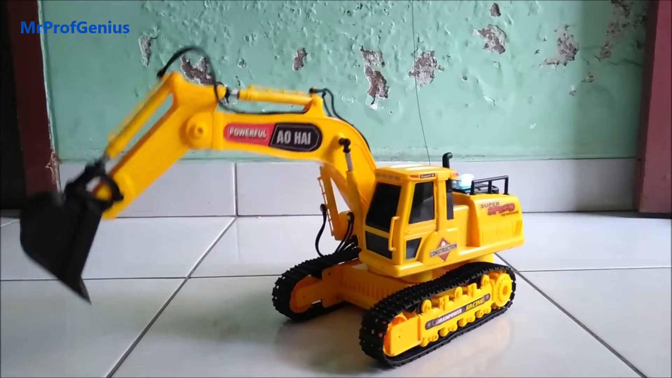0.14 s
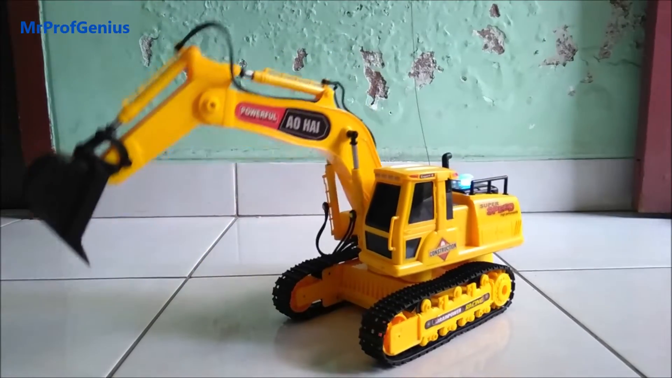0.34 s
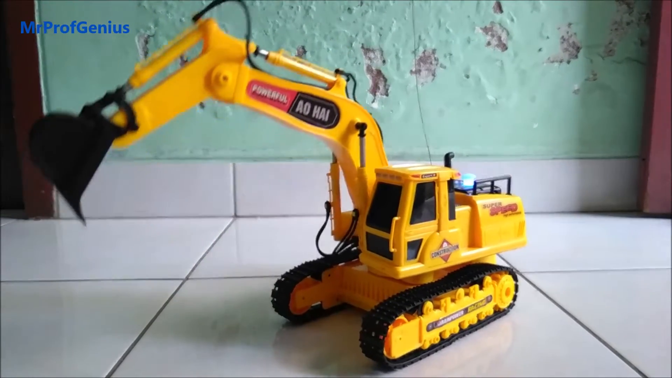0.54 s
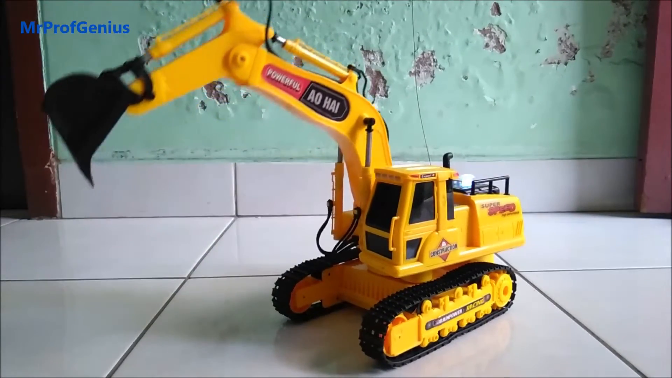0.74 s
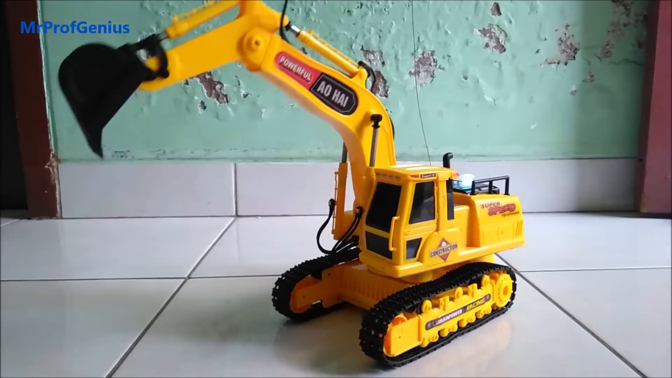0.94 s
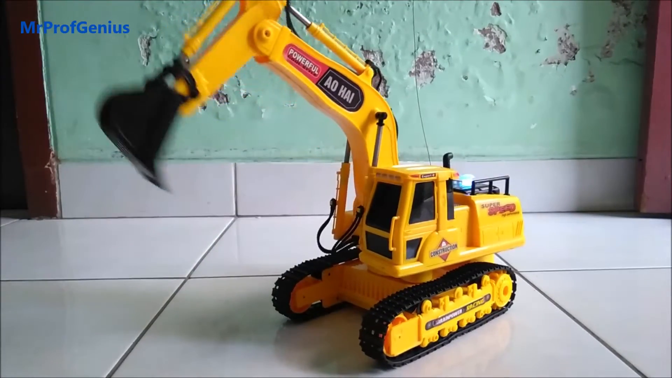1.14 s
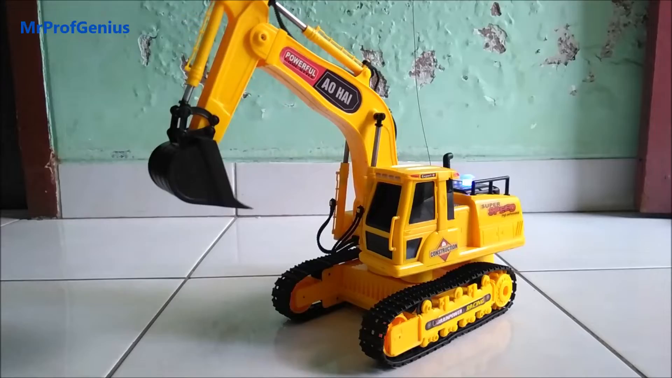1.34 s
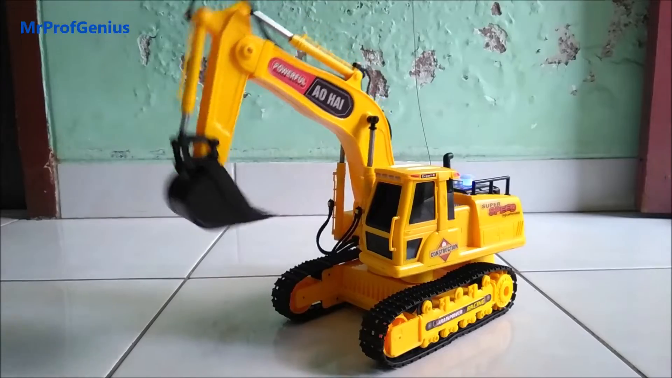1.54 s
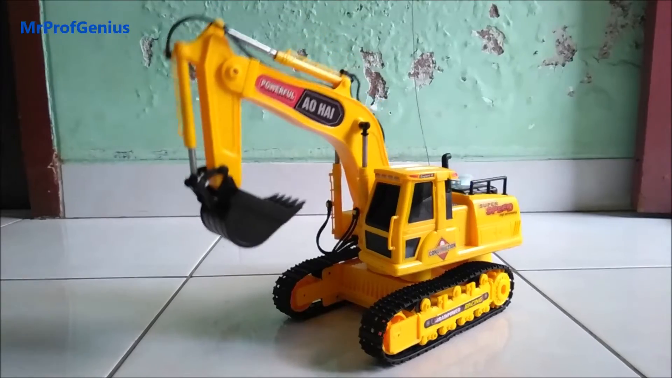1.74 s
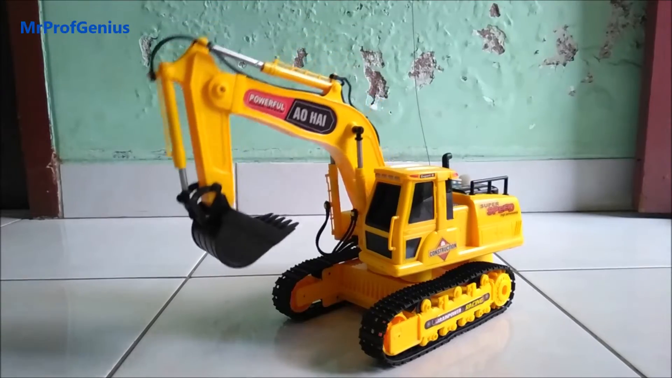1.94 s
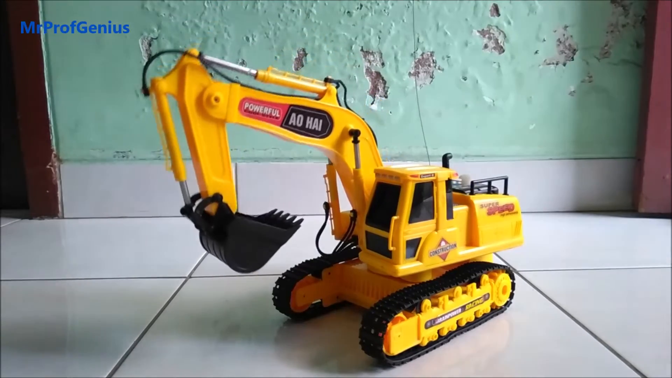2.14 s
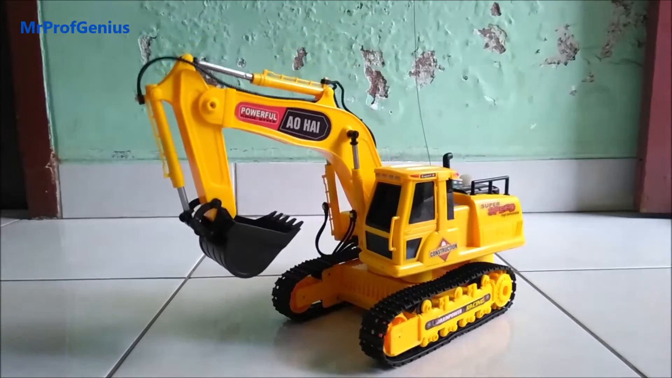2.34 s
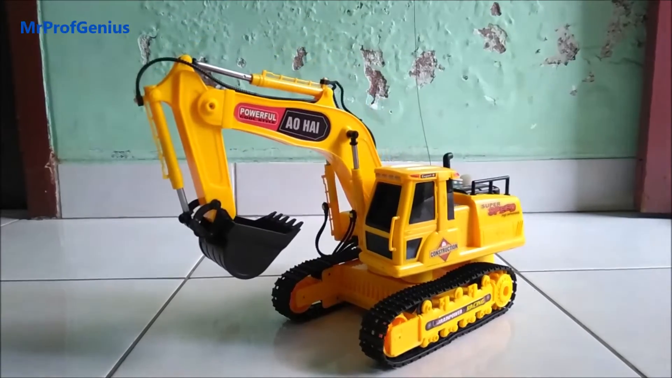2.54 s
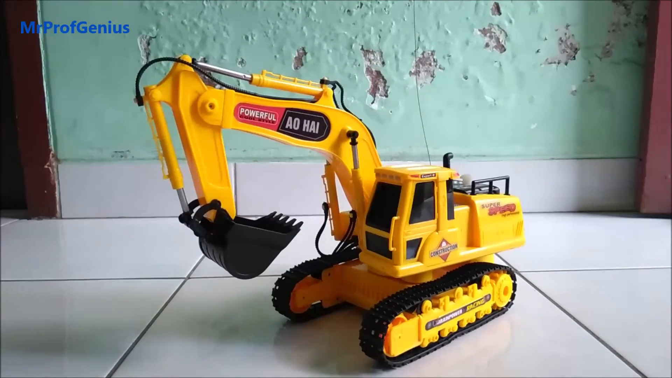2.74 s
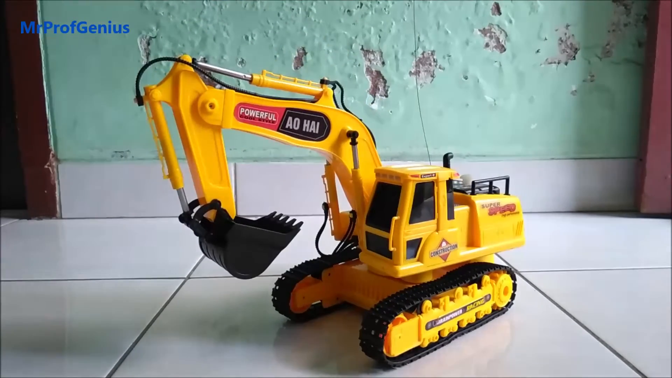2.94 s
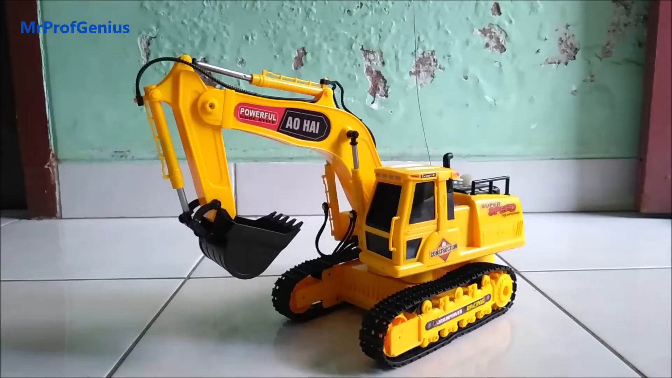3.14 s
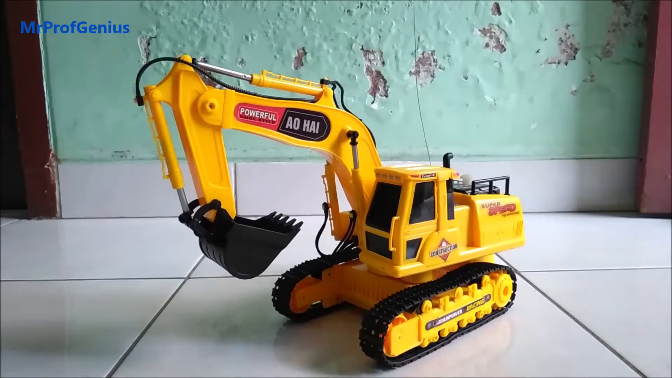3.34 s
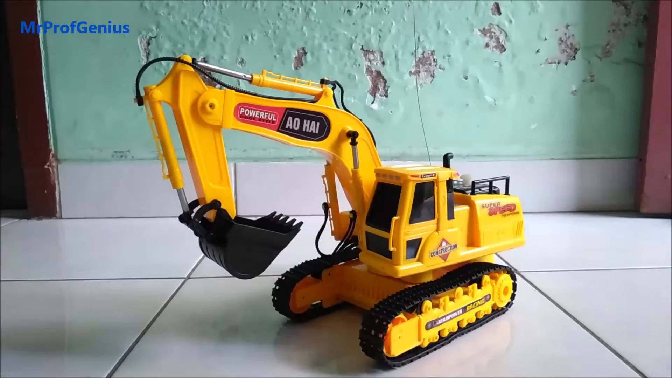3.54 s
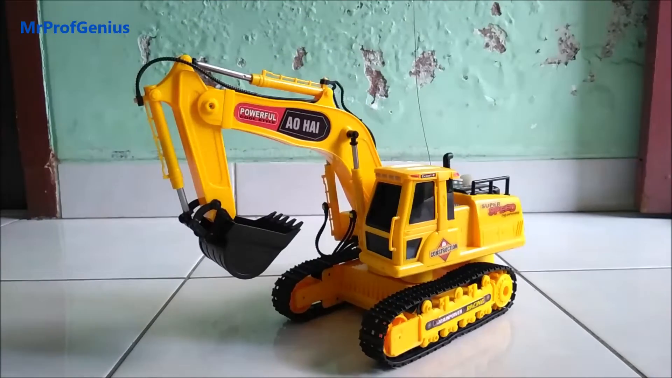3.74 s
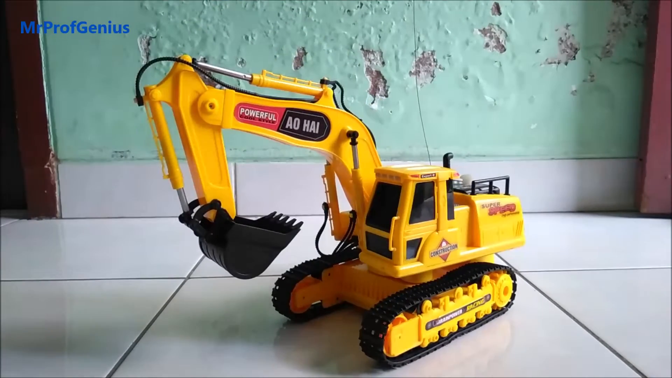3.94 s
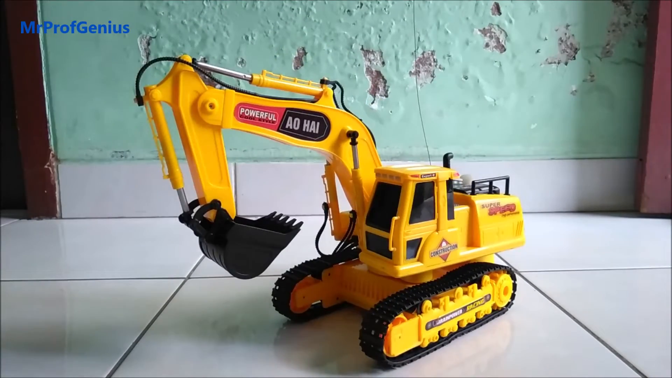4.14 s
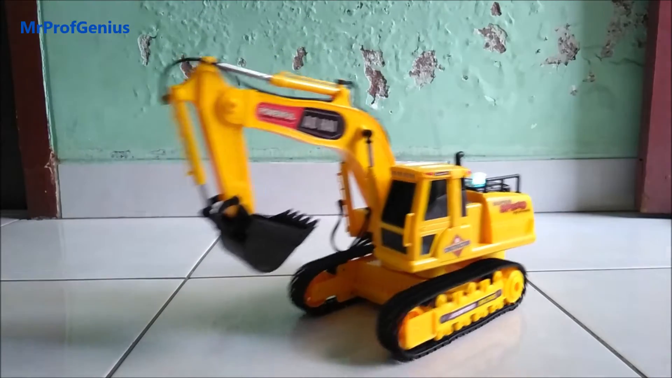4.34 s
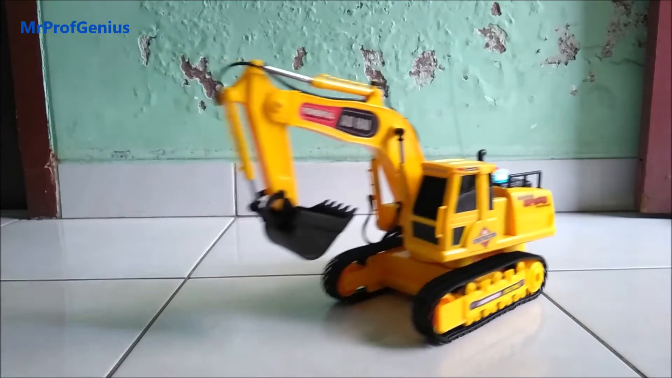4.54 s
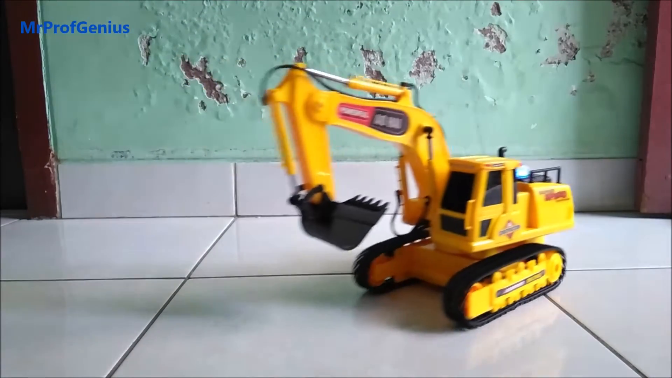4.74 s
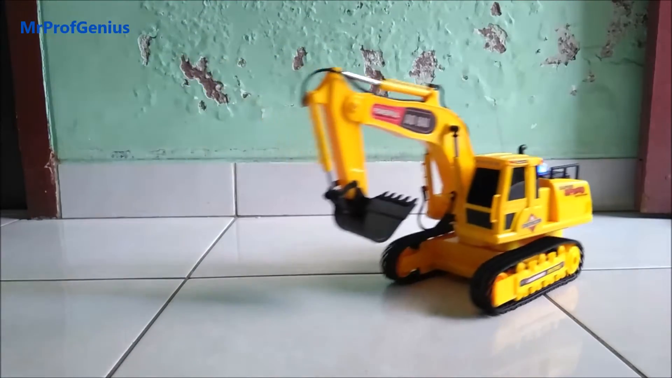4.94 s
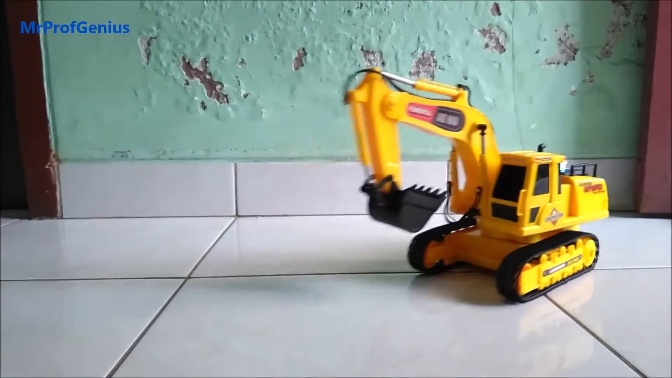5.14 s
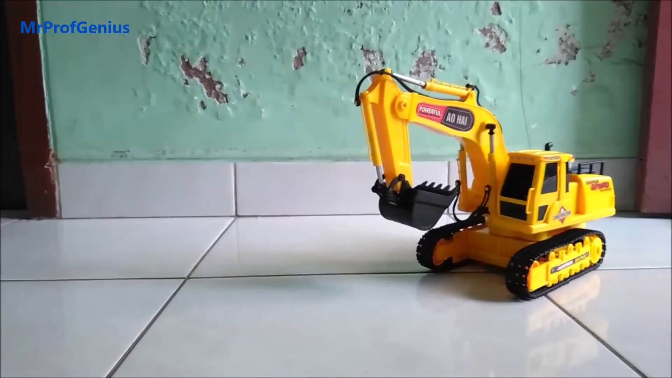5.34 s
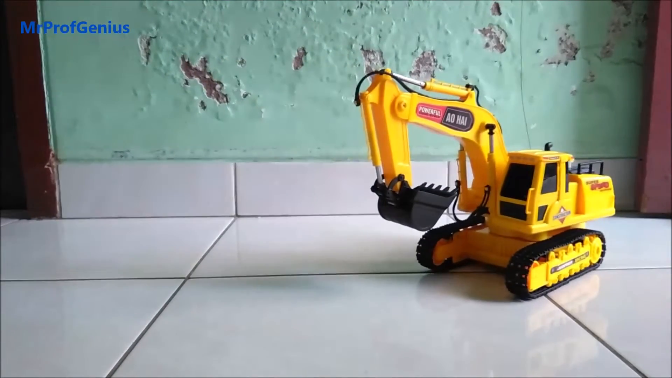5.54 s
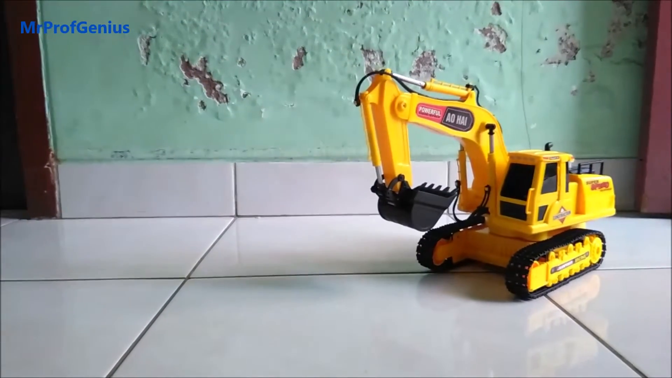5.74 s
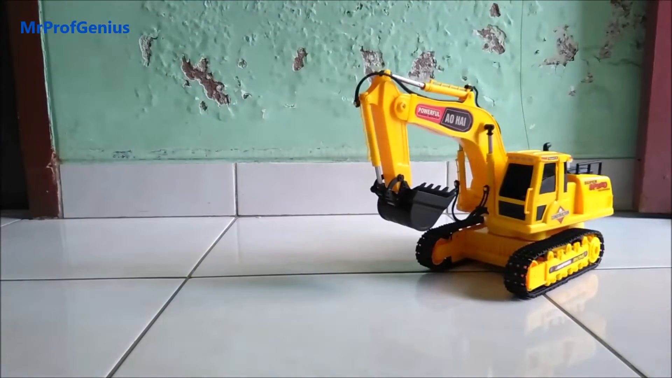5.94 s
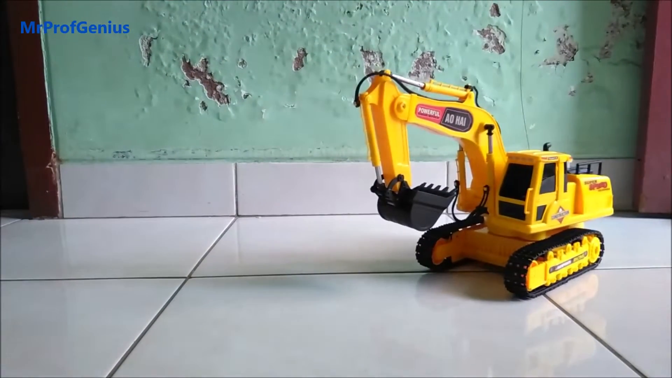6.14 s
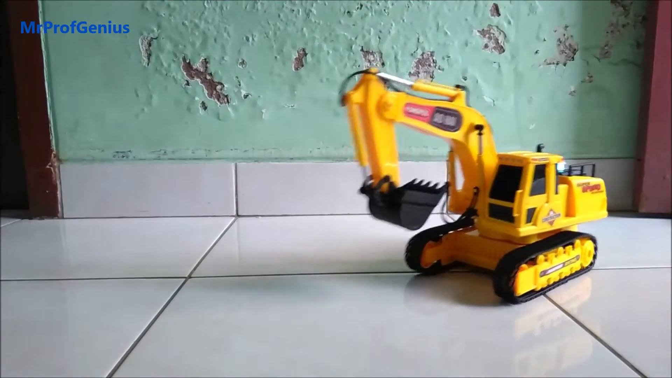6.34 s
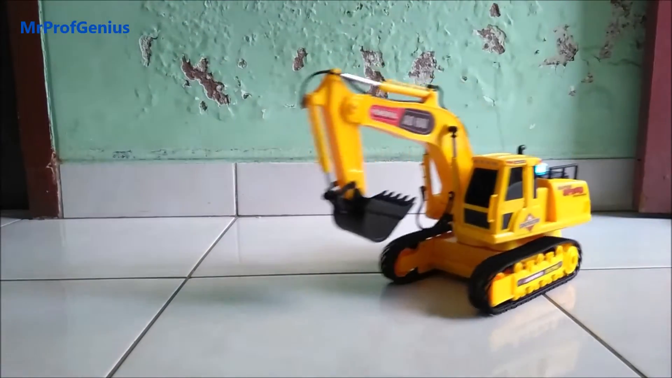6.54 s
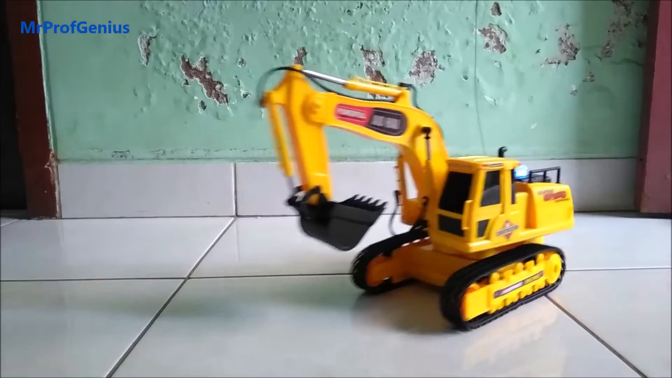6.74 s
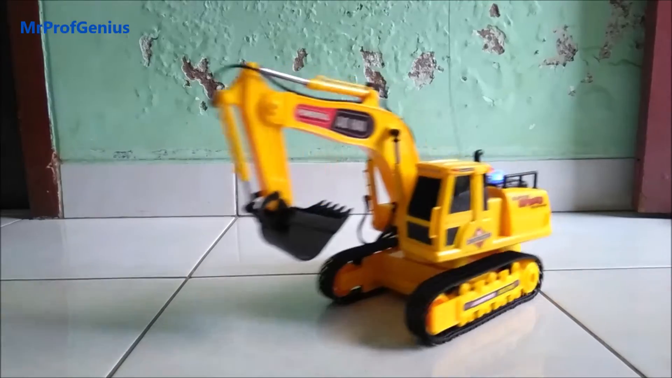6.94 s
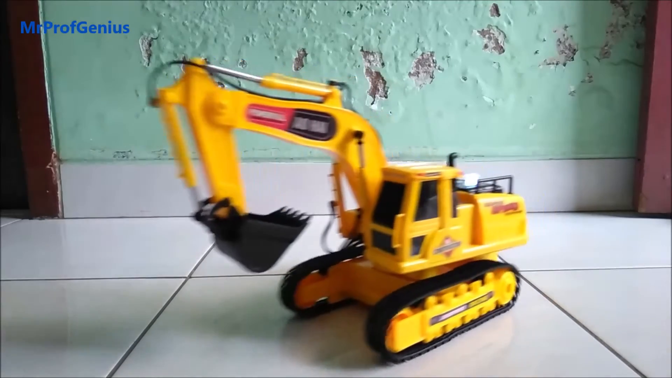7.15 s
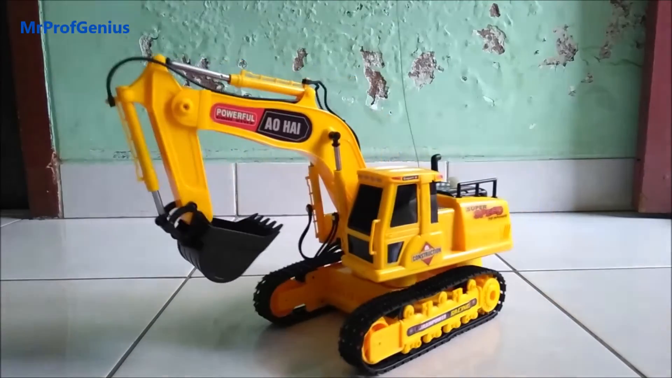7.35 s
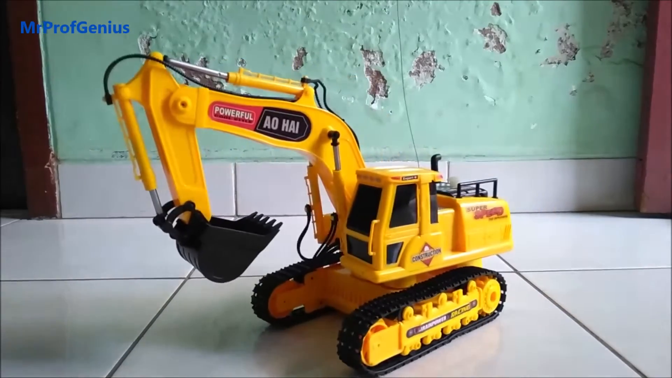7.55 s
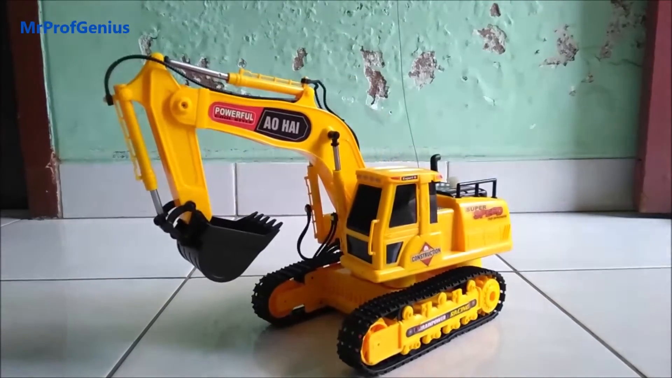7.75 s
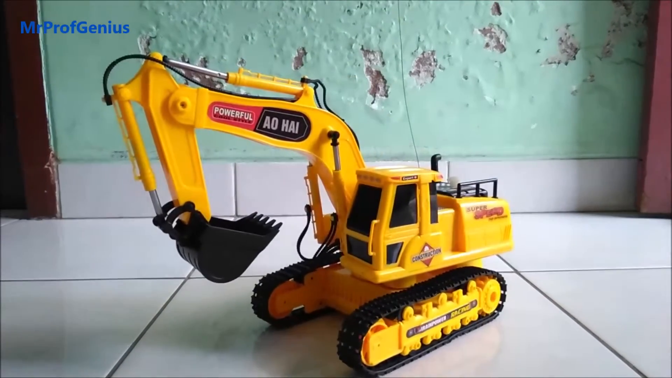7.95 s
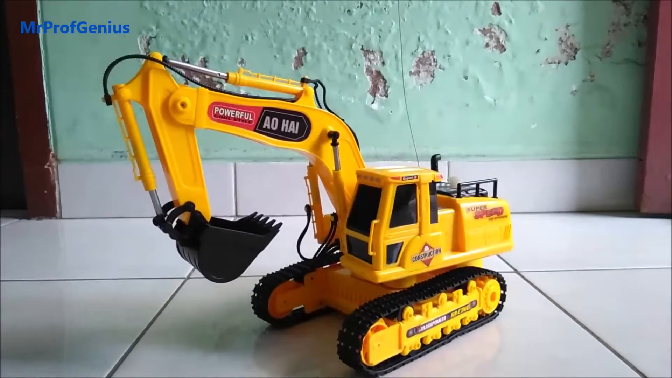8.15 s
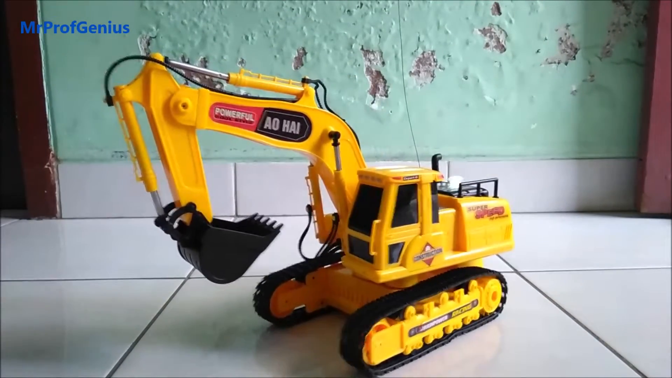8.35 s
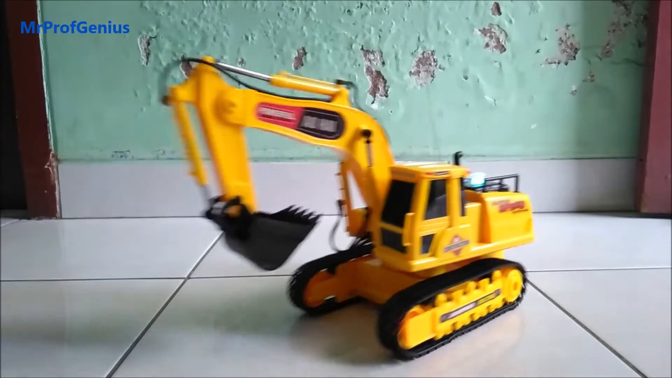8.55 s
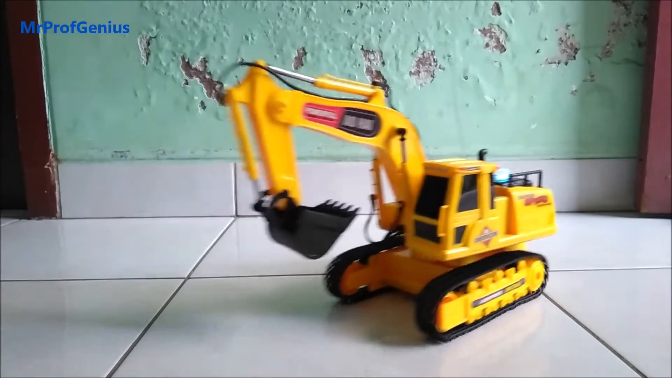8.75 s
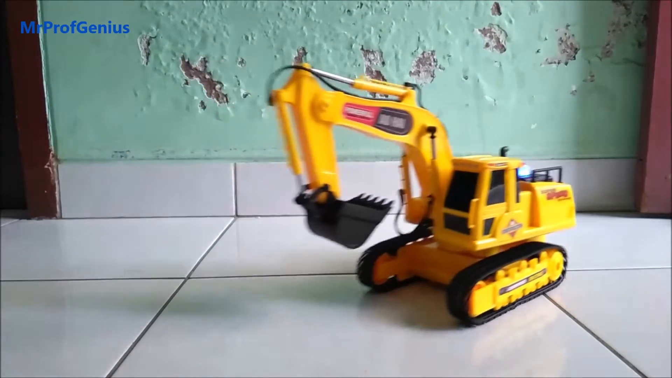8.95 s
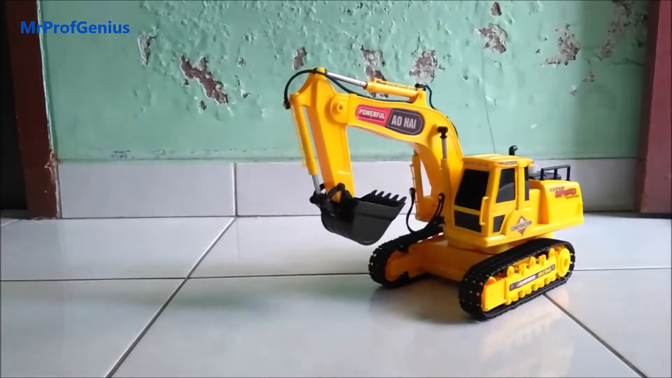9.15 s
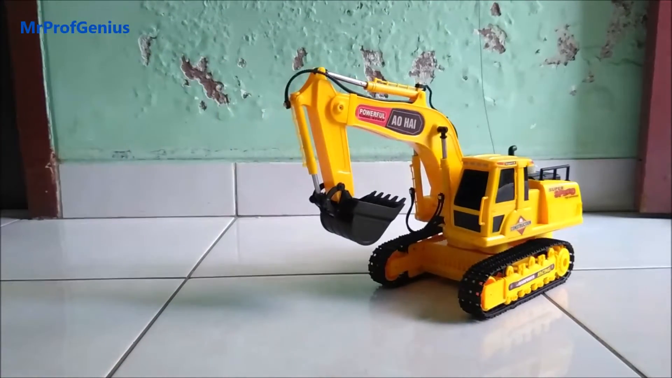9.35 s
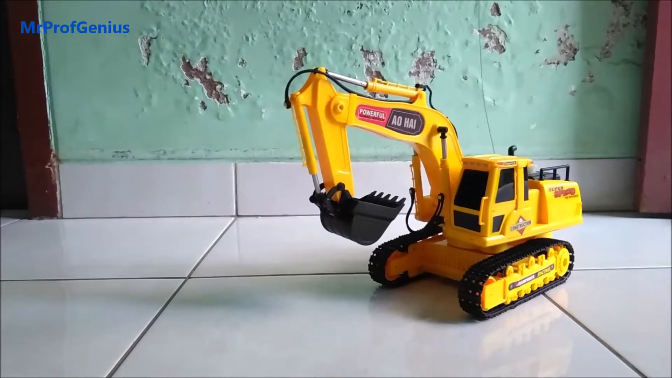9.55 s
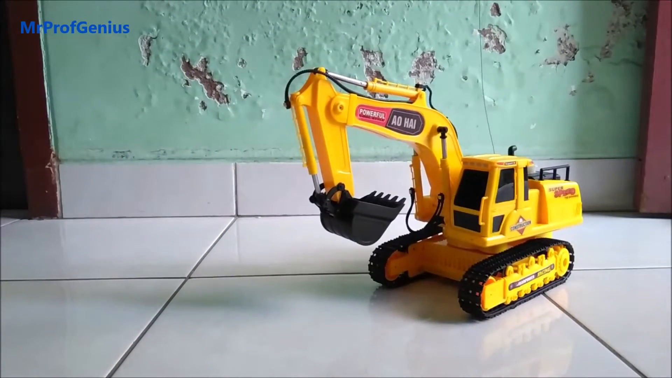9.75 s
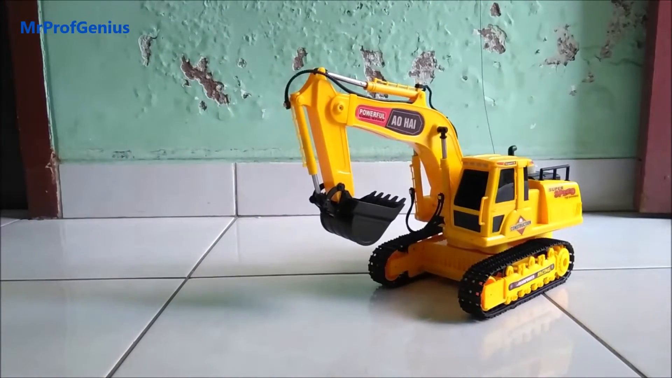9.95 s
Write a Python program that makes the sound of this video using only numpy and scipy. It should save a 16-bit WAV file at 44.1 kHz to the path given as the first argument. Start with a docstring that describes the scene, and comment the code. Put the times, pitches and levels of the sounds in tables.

```python
"""Toy digger on tiles.

A plastic digger's three-pole arm motor whines, speeds up and coasts to a stop; then the track gears
rattle through three short drives, each after a click of the remote's lever. The room hums low and rings
a little. A one-microphone camera stands near; its noise suppressor shuts the toy's treble when quiet."""
import sys
import numpy as np
from scipy import signal
from scipy.fft import rfft, irfft, next_fast_len
from scipy.io import wavfile
from scipy.ndimage import uniform_filter1d, map_coordinates

SR = 44100
rng = np.random.default_rng(int(sys.argv[2]) if len(sys.argv) > 2 else 0)


def dump(signal):
    """Clip the signal to [-1, 1] and save it as 16-bit WAV at the path in sys.argv[1]."""
    limited = np.clip(np.atleast_2d(signal).T, -1, 1)
    pcm = np.round(limited * 32767).astype(np.int16)
    wavfile.write(sys.argv[1], SR, pcm)


N = 440559

# Room rumble spectrum. Each row: frequency in Hz, relative density in dB.
RUMBLE_SPECTRUM = [(22, -41.5), (38, -9), (103, 3.5), (134, 0), (152, 3), (167, -7.5), (199, -2),
                   (212, -5.5), (228, -11.5), (330, -29), (430, -49), (730, -120)]
# Blotchy low-mid murk spectrum. Each row: frequency in Hz, relative density in dB.
MURK_SPECTRUM = [(150, -33.5), (250, -8.5), (366, -7.5), (437, 2), (564, -17.5), (673, -6), (735, -17.5),
                 (1470, -5), (1760, -25), (1880, -24), (2600, -51.5), (3380, -73.5), (5720, -120)]
# Mains hum. Each row: frequency in Hz, level in dB.
MAINS_PARTIALS = [(50, -69), (100, -68.5), (200, -65)]
# Amplifier hiss spectrum. Each row: frequency in Hz, relative density in dB.
AMPLIFIER_SPECTRUM = [(1200, -19.5), (2000, -1), (5000, -8), (10000, -7), (12600, -5.5), (13200, -30),
                      (15700, -29)]
# Faint far peeps. Each row: start in seconds, length in seconds, pitch in Hz, level in dB.
FAR_PEEPS = [(2.82, 0.055, 7550, -80), (5.956, .14, 7650, -71.5)]
# Soft far thumps. Each row: start in seconds, length in seconds, pitch in Hz, level in dB.
FAR_THUMPS = [(2.48, 0.29, 89.3, -49), (8.13, 0.34, 88.5, -50)]
# Room decay. Each row: frequency in Hz, T60 in seconds.
ROOM_DECAY = [(300, 0.27), (2000, 0.7), (8000, 0.64), (15000, 0.38)]
# Noise suppressor. Each row: frequency in Hz, threshold in dB per bin.
GATE_THRESHOLDS = [(500, -105), (2000, -96.5), (5000, -89.5), (10000, -95), (15000, -98)]

# Jolts from the swinging arm. Each row: start in seconds, level in dB.
ARM_JOLTS = [(0.0, -41.5), (0.37, -48), (0.6, -41), (1.02, -49), (1.15, -56), (1.45, -48), (1.63, -45),
             (1.95, -65)]
# Chassis shudder spectrum. Each row: frequency in Hz, relative density in dB.
ROCKING_SPECTRUM = [(30, -46), (48, -10), (65, 2.5), (90, -0.5), (150, -8.5), (220, -36.5)]
# Lever clicks, plastic ticks, gears taking up slack. Each row: start in seconds, relative level in dB,
# snap centre in Hz, relative case ring in dB, snap fall-off one octave away in dB (sign ignored).
CLICK_EVENTS = [(3.144, -41, 4230, -3, 5), (3.1939, -44, 3900, 1, 25), (3.269, -49, 8540, -2, 40),
                (3.9785, -29, 7400, -10.5, 17.5), (4.2607, -39, 2570, -32, 14), (5.8925, -67, 3480, 20, 15),
                (6.2617, -24.5, 4300, -32.5, 20), (8.136, -27, 6860, -7, -5),
                (8.2054, -39.5, 2750, -14.5, 8.5), (8.2362, -55.5, 2950, 17, 8.5),
                (8.2706, -46.5, 3990, -20.5, 13.5), (8.3757, -33, 2680, -42.5, 10),
                (9.8185, -47, 2900, -21, 7.5), (9.9183, -44, 3220, 7, 5)]
# Hollow case modes. Each row: frequency in Hz, relative level in dB, T60 in seconds.
CASE_MODES = [(560, 0, 0.025), (717, 3, 0.024), (975, 0, 0.018), (1200, 0, 0.014), (1753, 1, 0.012),
              (2860, -5, 0.02), (3530, -6, .018), (4100, -4, .02)]
# Track links hitting tile. Each row: start in seconds, level in dB, thud gain in dB, edge gain in dB.
LINK_KNOCKS = [(4.3565, -37, -4.5, -22), (5.0607, -30.5, -6, -19), (6.3962, -40.5, -17, -23),
               (6.4474, -33, -20, -19), (6.4875, -26.5, -26, -22), (6.642, -24.5, -21, -22.5),
               (6.8542, -25, -17.5, -21.5), (7.089, -25.5, -17.5, -5), (7.097, -27, -5, -9.5),
               (7.1362, -24.5, -10.5, -6), (7.141, -29.5, 5, 3.5)]
# Track link modes. Each row: frequency in Hz, relative level in dB, T60 in seconds.
LINK_MODES = [(562, 1, 0.022), (730, 3, 0.02), (1073, 2, 0.016), (1513, 7, 0.013), (1753, -8, 0.02)]

# Arm gear noise. Each row: time in seconds, hiss level in dB, linkage scrape level in dB.
ARM_LEVELS = [(0.0, -48, -60), (0.4, -48.5, -67), (0.86, -46, -83), (1.06, -40.5, -45), (1.14, -43, -65),
              (1.62, -42.5, -68), (1.8, -42.5, -57), (1.95, -48.5, -64), (2.29, -56, -81),
              (2.39, -62.5, -70), (2.55, -95, -83)]
# Arm motor speed until power off. Each row: time in seconds, shaft rate in Hz.
SHAFT_SPEED = [(0, 331), (.06, 324), (.11, 323.9), (.15, 321), (.2, 322.2), (.31, 321.3), (.36, 316.4),
               (.5, 322.4), (.56, 322.7), (.62, 325.9), (.75, 330.3), (.8, 335.2), (.89, 339.2),
               (.93, 339.7), (1.08, 350.5), (1.16, 366.9), (1.22, 373.7), (1.29, 377.6), (1.4, 378),
               (1.61, 377.7)]
# Low shaft harmonics. Each row: multiple of the shaft rate, level before resonances in dB.
SHAFT_HARMONICS = [(1, -55), (2, -52), (3, -59), (4, -61), (5, -52), (6, -62), (7, -63), (8, -67), (9, -65),
                   (10, -66), (11, -66), (12, -65), (13, -71), (14, -75), (15, -66), (16, -70), (17, -74)]
# Motor housing resonances. Each row: centre in Hz, width in Hz, gain in dB.
HOUSING_RESONANCES = [(374, 25, 18), (659, 54, 8), (1025, 63, 14), (1372, 34, 17), (1936, 58, 17),
                      (2414, 60, 7), (3115, 450, 5), (3572, 121, 6), (4525, 114, 9), (5417, 275, 8),
                      (6726, 168, 4), (7725, 235, 6), (8729, 942, 8), (10521, 500, 9), (11305, 283, 11),
                      (12277, 313, 4), (13737, 344, 14), (14601, 511, 18), (15532, 388, 15)]
# Hollow arm resonances. Each row: centre in Hz, width in Hz, gain in dB.
ARM_RESONANCES = [(507, 110, 11), (846, 130, 0)]
# Arm gearbox resonances. Each row: centre in Hz, width in Hz, gain in dB.
GEARBOX_RESONANCES = [(1140, 150, -2.5), (1885, 87, 8), (6870, 240, 11.5), (8960, 250, 8.5),
                      (11300, 270, 3), (14370, 740, 6.5)]
# Arm gear hiss spectrum. Each row: frequency in Hz, relative density in dB.
GEAR_SPECTRUM = [(150, -8), (330, -10.5), (600, -4.5), (760, -2.5), (880, -12), (1100, -7), (1350, -6.5),
                 (1700, -7), (2200, -12), (4800, -16.5), (7600, -22), (10800, -9.5), (12500, -18.5),
                 (15700, -16)]
# Linkage scrape spectrum. Each row: frequency in Hz, relative density in dB.
SCRAPE_SPECTRUM = [(3000, -50.5), (6500, -2), (8000, -8), (9500, -4.5), (14000, -32)]

# Track drives. Each row: power on in seconds, power off in seconds, rattle level in dB,
# relative brightness in dB, brightening in dB per second, relative grind in dB.
TRACK_DRIVES = [(4.211, 5.142, -35, -15, 8.5, -15), (6.213, 7.224, -35, -15, 5.2, -16),
                (8.327, 8.977, -35.5, -13, 7, -13.5)]
# Track gear rattle spectrum. Each row: frequency in Hz, relative density in dB.
RATTLE_SPECTRUM = [(250, -41.5), (400, -17), (800, -16.5), (1100, -9), (2000, -8.5), (3000, -2.5),
                   (5500, -8.5), (7500, -5), (10000, -13), (12500, -17.5), (15700, -21.5)]
# Chassis shell resonances. Each row: centre in Hz, width in Hz, gain in dB.
SHELL_RESONANCES = [(565, 70, 8), (1530, 120, 7), (1800, 120, 3), (2640, 300, 8), (3150, 150, 4),
                    (3720, 130, 6), (4290, 140, 10), (5120, 200, 6), (5800, 130, 4), (6200, 200, 6),
                    (7490, 180, 3), (8900, 300, 2), (10920, 150, 5)]


def amp(db):
    return 10 ** (np.asarray(db) / 20)


def unit_rms(x):
    return x / np.sqrt(np.mean(x ** 2) + 1e-20)


def along(points, hz):
    """Interpolate (Hz, value) points on a log frequency axis."""
    points_hz, values = np.transpose(points)
    return np.interp(np.log(hz + 1), np.log(points_hz + 1), values)


def curves(rows, count):
    """One value per sample for each column after the time."""
    times_s, *columns = np.transpose(rows)
    return [np.interp(np.arange(count) / SR, times_s, column) for column in columns]


def wobble(rate_hz):
    """Smooth random curve through unit-variance knots."""
    knots = rng.standard_normal(int(N * rate_hz / SR) + 4)
    return map_coordinates(knots, [np.arange(N) * rate_hz / SR])


def filtered(x, response):
    """Apply a zero-phase gain, given as a function of Hz."""
    size = next_fast_len(N + SR // 2)
    return irfft(rfft(x, size) * response(np.fft.rfftfreq(size, 1 / SR)), size)[..., :N]


def coloured(x, spectrum):
    """Shape x by a spectrum; RMS 1."""
    return unit_rms(filtered(x, lambda hz: amp(along(spectrum, hz))))


def boost(resonances, hz):
    """Gain of a flat path plus resonant peaks."""
    peaks = sum(amp(2 * db) / (1 + (2 * (hz - centre_hz) / width_hz) ** 2)
                for centre_hz, width_hz, db in resonances)
    return np.sqrt(1 + peaks)


def patchy(x, depth_db):
    """Random gain in patches of frequency and time."""
    bins = signal.stft(x, nperseg=1024)[2]
    field = uniform_filter1d(rng.standard_normal(bins.shape), 4, axis=0)
    field = uniform_filter1d(field, 7, axis=1)
    return signal.istft(bins * amp(depth_db * unit_rms(field)), nperseg=1024)[1][:N]


def ring(modes, t, thud_db=0):
    """Damped modes, varied per hit by grip and load; thud_db acts below 1200 Hz."""
    return sum(amp(db + thud_db * (hz < 1200) + rng.normal(0, 2.3) - 60 * t / t60_s)
               * np.sin(2 * np.pi * hz * rng.normal(1, 0.026) * t) for hz, db, t60_s in modes)


def background_tone():
    """Background: lumpy room rumble, mains hum, a blotchy low-mid murk and even amplifier hiss."""
    t = np.arange(N) / SR
    rumble = amp(-58 + 1.76 * wobble(6))
    rumble *= coloured(patchy(rng.standard_normal(N), depth_db=1), RUMBLE_SPECTRUM)
    hum = sum(amp(db + 0.96 * wobble(6.3)) * np.sin(2 * np.pi * hz * t + 0.53 * wobble(0.99))
              for hz, db in MAINS_PARTIALS)
    murk = amp(-70 + 1.5 * wobble(3))
    murk *= coloured(patchy(rng.standard_normal(N), depth_db=4.8), MURK_SPECTRUM)
    hiss = amp(-92 + 0.63 * wobble(15)) * coloured(rng.standard_normal(N), AMPLIFIER_SPECTRUM)
    return rumble + hum + murk + hiss


def far_tones(rows, sink):
    """Soft tones that sink in pitch as they fade."""
    out = np.zeros(N)
    for start_s, length_s, hz, db in rows:
        progress = np.linspace(0, 1, round(length_s * SR))
        envelope = amp(db) * np.sin(np.pi * progress ** 0.5)
        phase = 2 * np.pi * hz * length_s * (progress - sink * progress ** 2)
        out[round(start_s * SR):][:len(progress)] = envelope * np.sin(phase)
    return out


def room_reverb(x):
    """Diffuse tail; each frequency decays at its own rate."""
    hz, t, bins = signal.stft(rng.standard_normal(SR // 2), SR, nperseg=256)
    decay = amp(-60 * t / along(ROOM_DECAY, hz)[:, None])
    tail = signal.istft(bins * decay, SR, nperseg=256)[1]
    delayed = np.pad(x, (200, 0))
    return signal.fftconvolve(delayed, tail / np.linalg.norm(tail))[:N]


def noise_suppressor(x):
    """Each band closes as its smoothed power sinks to the threshold."""
    hz, _, bins = signal.stft(x, SR, nperseg=512)
    power = uniform_filter1d(np.abs(bins) ** 2, 7, axis=0)
    power = np.abs(uniform_filter1d(power, 3, axis=1))
    threshold = amp(2 * along(GATE_THRESHOLDS, hz))[:, None]
    gain = np.clip(1 - threshold / (power + 1e-20), 0, 1)
    return signal.istft(bins * gain, SR, nperseg=512)[1][:N]


def chassis_rocking(rise_s=0.014, t60_s=1):
    """Low shudders of the body as the arm swings."""
    envelope, t = np.zeros(N), np.arange(SR) / SR
    for start_s, db in ARM_JOLTS:
        envelope[round(start_s * SR):][:SR] += amp(db - 60 * t / t60_s) * (1 - np.exp(-t / rise_s))
    return envelope * coloured(rng.standard_normal(N), ROCKING_SPECTRUM)


def plastic_clicks(rise_s=0.0014):
    """A short band of noise snaps; the hollow case rings behind it."""
    out, t = np.zeros(N + SR), np.arange(SR // 8) / SR
    hz = np.fft.rfftfreq(len(t), 1 / SR)
    attack = 1 - np.exp(-t / rise_s)
    decay = amp(-60 * t / 0.019) + 0.25 * amp(-60 * t / 0.0043)
    for start_s, db, centre_hz, case_db, fall_db in CLICK_EVENTS:
        band = amp(-abs(fall_db) * np.log2((hz + 1) / centre_hz) ** 2)
        snap = unit_rms(irfft(rfft(rng.standard_normal(len(t))) * band)) * decay
        hollow = amp(case_db + 1) * ring(CASE_MODES, t)
        out[round(start_s * SR):][:len(t)] += amp(db - 9) * (snap + hollow) * attack
    return out[:N]


def link_knocks(rise_s=0.0017, crack_t60_s=0.017):
    """A link slaps the floor: hollow modes, a dull crack and a sharp edge."""
    out, t = np.zeros(N + SR), np.arange(SR // 8) / SR
    attack = 1 - np.exp(-t / rise_s)
    for start_s, db, thud_db, edge_db in LINK_KNOCKS:
        hollow = ring(LINK_MODES, t, thud_db)
        dull = 0.57 * uniform_filter1d(rng.standard_normal(len(t)), size=5)
        edge = amp(edge_db) * rng.standard_normal(len(t))
        crack = amp(-60 * t / crack_t60_s) * (dull + edge)
        out[round(start_s * SR):][:len(t)] += amp(db) * (hollow + crack) * attack
    return out[:N]


def brush_harmonics(poles=3, top_multiple=48):
    """(multiple, dB) rows above the low harmonics; multiples of the pole count stand out."""
    rows = []
    for step, multiple in enumerate(range(len(SHAFT_HARMONICS) + 1, top_multiple + 1), start=1):
        pole_db = (6.5 - 0.07 * step) * (multiple % poles == 0)
        pair_db = 1.5 * (multiple % (2 * poles) == 0)
        rows.append((multiple, -66.5 - 0.17 * step + pole_db + pair_db))
    return rows


def motor_whine(shaft_hz, shaft_rad, speed_db, coast_s, hop=64):
    """Shaft harmonics slide through the housing and arm resonances, fading as the motor coasts."""
    count = len(shaft_hz)
    samples, frames = np.arange(count), np.arange(0, count, hop)
    knots = np.linspace(0, count, num=80)
    whine_db = 2.9 * speed_db
    brush_db = 2.4 * speed_db - 2 * (1 - np.exp(-coast_s / 0.03))  # 2 dB less without current
    tone = np.zeros(count)
    for multiple, db in SHAFT_HARMONICS + brush_harmonics():
        fade_db, spread_db = (whine_db, 1.3) if multiple < 8 else (brush_db, 3.5)
        flutter_db = np.interp(frames, knots, rng.normal(0, spread_db, len(knots)))
        hz = multiple * shaft_hz[frames]
        body = boost(HOUSING_RESONANCES + ARM_RESONANCES, hz)
        body /= np.sqrt(1 + (290 / hz) ** 12)  # too small to radiate bass
        gain = np.interp(samples, frames, amp(fade_db[frames] + db + flutter_db) * body)
        tone += gain * np.sin(multiple * shaft_rad + rng.uniform(0, 2 * np.pi))
    return tone


def arm_drive(run_down_s=0.77, dry_friction_hz=65):
    """The motor runs, then coasts; gears hiss in step with the shaft and the linkage scrapes."""
    count = round(ARM_LEVELS[-1][0] * SR)
    off_s, off_hz = SHAFT_SPEED[-1]
    coast_s = np.clip(np.arange(count) / SR - off_s, 0, None)
    speed = ((off_hz + dry_friction_hz) * np.exp(-coast_s / run_down_s) - dry_friction_hz) / off_hz
    shaft_hz = curves(SHAFT_SPEED, count)[0] * speed * (1 + 0.0003 * wobble(30)[:count])
    shaft_rad = 2 * np.pi * np.cumsum(shaft_hz) / SR
    whine = motor_whine(shaft_hz, shaft_rad, 20 * np.log10(speed), coast_s)
    teeth = patchy(rng.standard_normal(N), depth_db=6.5)
    gears = filtered(teeth, lambda hz: boost(GEARBOX_RESONANCES, hz))
    hiss = coloured(gears, GEAR_SPECTRUM)[:count] * (1 + 0.067 * np.sin(shaft_rad))
    scrape = coloured(rng.standard_normal(N) * amp(2.2 * wobble(60)), SCRAPE_SPECTRUM)[:count]
    hiss_db, scrape_db = curves(ARM_LEVELS, count)
    return np.pad(whine + amp(hiss_db) * hiss + amp(scrape_db) * scrape, (0, N - count))


def track_levels_db(spin_up_s=0.029, roll_out_s=0.48):
    """Rattle level, relative brightness and relative grind follow the track speed."""
    t, levels_db = np.arange(N) / SR, np.full((3, N), -150.)
    for on_s, off_s, rattle_db, bright_db, bright_db_per_s, grind_db in TRACK_DRIVES:
        moving = (t > on_s) & (t < off_s + roll_out_s)
        run_s, roll_s = t[moving] - on_s, np.clip(t[moving] - off_s, 0, None)
        speed = (1 - np.exp(-run_s / spin_up_s)) * (1 - roll_s / roll_out_s)
        speed_db = 20 * np.log10(speed + 1e-6)
        slack_db = -7 * (run_s < 0.035)  # gears run light until their play is taken up
        unload_db = np.exp(-roll_s / 0.023) - 1  # quieter once the motor stops pushing
        levels_db[:, moving] = [rattle_db + 3.66 * speed_db + slack_db + unload_db,
                                bright_db + 1.9 * speed_db + bright_db_per_s * (run_s - roll_s),
                                grind_db - 1.33 * speed_db]
    return levels_db


def track_gears(grind_hz=1800, bright_hz=8800):
    """Loose teeth strike densely enough to blur into throbbing noise that rings the shell."""
    teeth = rng.standard_normal(N) * amp(0.7 * wobble(15) + 0.6 * wobble(60) + 1.3 * wobble(260))
    rattle = filtered(patchy(teeth, depth_db=2.1),
                      lambda hz: amp(along(RATTLE_SPECTRUM, hz)) * boost(SHELL_RESONANCES, hz))
    low = lambda hz: 1 / (1 + (hz / grind_hz) ** 8)
    high = lambda hz: 1 - 1 / (1 + (hz / bright_hz) ** 8)
    mid = lambda hz: 1 - low(hz) - high(hz)
    grind, body, bright = (unit_rms(filtered(rattle, band)) for band in (low, mid, high))
    rattle_db, bright_db, grind_db = track_levels_db()
    return amp(rattle_db) * (body + amp(grind_db) * grind + amp(bright_db) * bright)


def scene():
    """Toy and reverb through the suppressor, plus rocking and background; mono on two channels."""
    digger = arm_drive() + track_gears() + link_knocks()
    clicks = plastic_clicks()
    toy = digger + amp(-11) * room_reverb(digger) + clicks + amp(-1.5) * room_reverb(clicks)
    far = far_tones(FAR_PEEPS, sink=0.011) + far_tones(FAR_THUMPS, sink=0.12)
    return np.tile(noise_suppressor(toy) + chassis_rocking() + far + background_tone(), (2, 1))


def record(dry):
    """Camera band limit."""
    stop_hz, taper_hz = 15830, 160
    return filtered(dry, lambda hz: np.sin(np.pi / 2 * np.clip((stop_hz - hz) / taper_hz, 0, 1)) ** 2)


dry = scene()
out = record(dry)
dump(out)
```